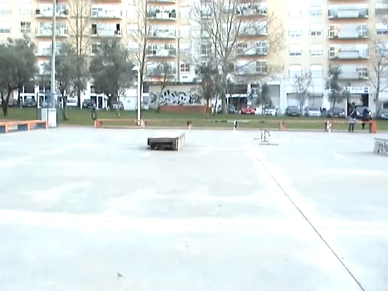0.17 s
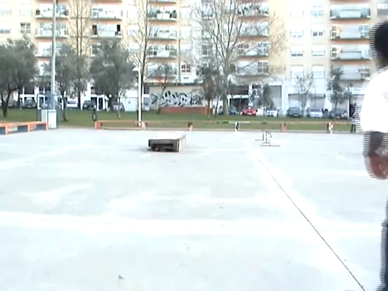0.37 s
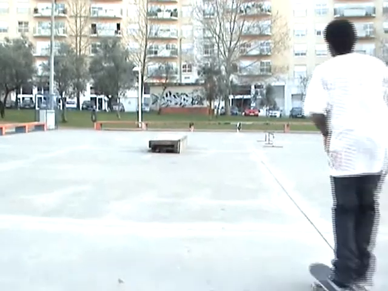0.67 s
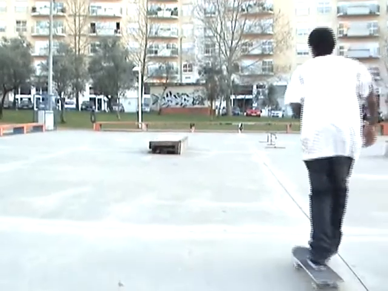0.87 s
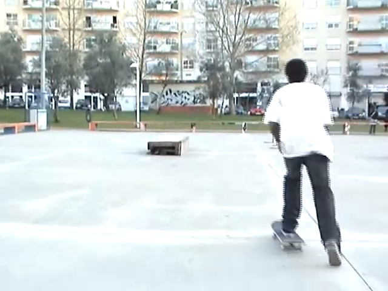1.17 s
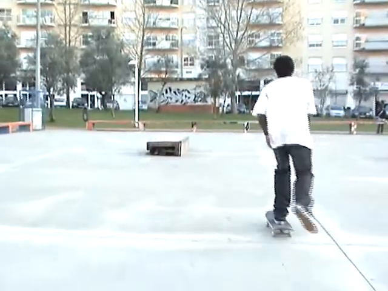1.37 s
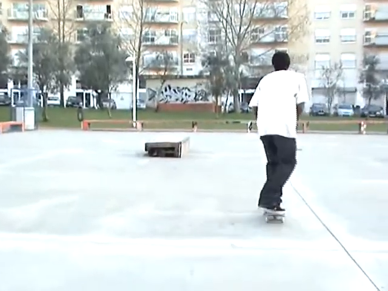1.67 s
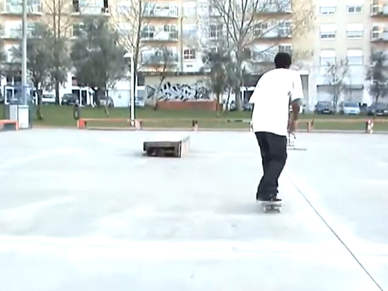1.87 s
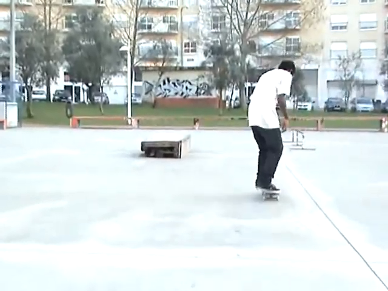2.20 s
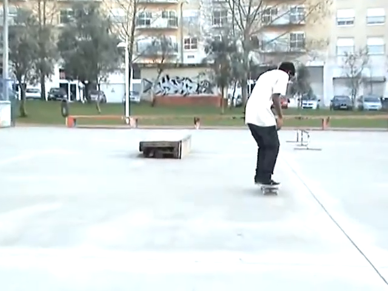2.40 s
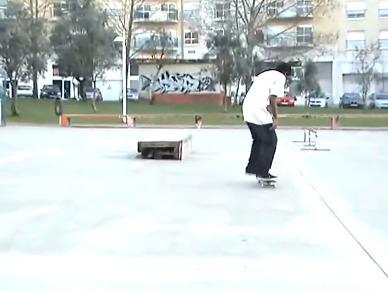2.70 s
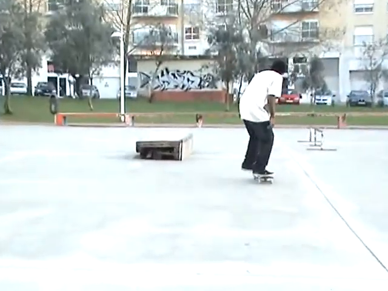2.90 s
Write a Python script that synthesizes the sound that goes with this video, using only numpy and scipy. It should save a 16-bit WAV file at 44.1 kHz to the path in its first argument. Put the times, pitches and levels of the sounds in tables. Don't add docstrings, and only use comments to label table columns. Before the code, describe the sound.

Skateboard wheels roll on gritty concrete after 0.1 s of silence. Loose trucks rattle and deck knocks cluster at 0.2-0.35 s; a soft shoe thump falls near 0.65. A brighter metallic rattle with faint squeal comes at 1.1-1.4, hard clacks at 1.45 and 1.58, lighter knocks at 1.8-2.3, low hum near 2.1, and a sharp double clack at 2.96. Faint traffic hiss and breeze stay behind.

```python
import sys
import numpy as np
from scipy import signal
from scipy.fft import rfft, irfft, next_fast_len
from scipy.io import wavfile
from scipy.ndimage import uniform_filter1d, map_coordinates

SR = 44100
rng = np.random.default_rng(int(sys.argv[2]) if len(sys.argv) > 2 else 0)


def master_out(mix):
    frames = np.transpose(np.atleast_2d(mix))
    ceiling = np.clip(frames, -1, 1)
    pcm = np.round(ceiling * 32767).astype(np.int16)
    wavfile.write(sys.argv[1], SR, pcm)


def elevation(decibels):
    levels = np.asarray(decibels, float)
    return 10 ** (levels / 20)


N = 134505


def unit(x):
    return x / np.sqrt(np.mean(x ** 2) + 1e-20)


def along(points, hz):
    f, v = np.transpose(points)
    return np.interp(np.log(hz + 1), np.log(f + 1), v)


def curves(rows):
    s, *cols = np.transpose(rows)
    return [np.interp(np.arange(N) / SR, s, c) for c in cols]


def wobble(rate_hz):
    knots = rng.standard_normal(int(N * rate_hz / SR) + 4)
    return map_coordinates(knots, [np.arange(N) * rate_hz / SR])


def swell(centre_s, half_s):
    return np.exp(-((np.arange(N) / SR - centre_s) / half_s) ** 4)


def filtered(x, response):
    m = next_fast_len(N + SR // 2)
    return irfft(rfft(x, m) * response(np.fft.rfftfreq(m, 1 / SR)), m)[..., :N]


def coloured(x, spectrum):
    return unit(filtered(x, lambda hz: elevation(along(spectrum, hz))))


def body(peaks):
    def response(f):
        total = 0
        for k, (centre, width, db) in enumerate(peaks):
            damping = 1j * f * width
            total = total + (-1) ** k * elevation(db) * damping / (centre ** 2 - f ** 2 + damping)
        return total
    return response


def ringing(x, peaks, slope_hz, slope_width_hz):
    modes = filtered(x, body(peaks))
    return unit(filtered(modes, body([(slope_hz, slope_width_hz, 0)])))


def grit(rate_hz, depth_db):
    return unit(rng.standard_normal(N) * elevation(depth_db * wobble(rate_hz)))


def patchy(x, depth_db):
    z = signal.stft(x, nperseg=256)[2]
    field = uniform_filter1d(rng.standard_normal(z.shape), size=5, axis=0)
    field = uniform_filter1d(field, size=12, axis=1)
    return unit(signal.istft(z * elevation(depth_db * unit(field)), nperseg=256)[1][:N])


def scatter(x):
    z = signal.stft(x, nperseg=256)[2]
    turned = z * np.exp(2j * np.pi * rng.random(z.shape))
    return 1.9 * signal.istft(turned, nperseg=256)[1][:N]


def contacts(rows, t60_s, wide, splash_db):
    rise_s, trim_db = 0.0006, -1.5
    out, t = np.zeros(N), np.arange(SR // 40) / SR
    f = np.fft.rfftfreq(len(t), 1 / SR) + 1
    shape = elevation(-60 * t / t60_s) * (1 - np.exp(-t / rise_s))
    for s, db, hz in rows:
        start = round(s * SR)
        offset = np.log(f / hz) / wide
        gain = np.exp(-offset ** 2) + elevation(splash_db) * np.exp(-(offset / 6.6) ** 2)
        burst = shape * irfft(rfft(rng.standard_normal(len(t))) * gain, len(t))
        burst = burst / np.abs(burst).max()
        out[start:][:len(t)] += elevation(db + trim_db) * burst[:N - start]
    return out


def town():
    # f/Hz, level/dB per Hz
    hiss_spectrum = [(880, 0.5), (1500, -11.5), (1770, 4), (3580, -11.5), (6970, -12.5), (10300, -43),
                     (11900, -19), (15600, -55)]
    # f/Hz, level/dB per Hz
    breeze_spectrum = [(15, -40), (30, -3), (42, 8), (60, 6), (110, -33), (250, -120)]
    hiss = elevation(-37.5 + 0.2 * wobble(1.7)) * coloured(rng.standard_normal(N), hiss_spectrum)
    return hiss + elevation(-42) * coloured(rng.standard_normal(N), breeze_spectrum)


def fronts(x, t60_s):
    t = np.arange(SR // 4) / SR
    tail = rng.standard_normal((2, len(t))) * elevation(-60 * t / t60_s)
    return signal.fftconvolve(x[None], tail / np.linalg.norm(tail[0]), axes=1)[:, :N]


def shoe():
    # t/s, level/dB, f/Hz
    footfalls = [
        (0.65, -11.5, 75.6),
        (1.178, -18, 121),
        (1.231, -16.5, 116),
        (1.784, -13.5, 71.4),
        (1.791, -27, 170),
        (1.885, -22.5, 90),
    ]
    out, t = np.zeros(N), np.arange(SR // 8) / SR
    for s, db, hz in footfalls:
        push = t / 0.0045 * np.exp(-t / 0.0062) * np.sin(2 * np.pi * hz * t)
        out[round(s * SR):][:len(t)] -= elevation(db + 4) * push
    return out


def joints():
    # t/s, peak/dB, blow f/Hz, blow time/ms; mostly wheels over slab edges, while the rows at
    # .652 and .667 are the hard edges of the firm foot push at 0.65 s
    deck_blows = [(.228, -7.5, 700, 1.9), (.2645, -7.5, 720, 1.1), (.335, -9, 700, 2.6),
                  (.352, -12.5, 700, 2.7), (.45, -14, 710, 2.5), (.59, -10, 567, 3.1),
                  (.652, -10, 610, 0.28), (.667, -10, 670, 0.75), (1.176, -6.5, 640, 2.4),
                  (1.226, -9, 624, 2.2), (1.274, -13, 700, 1.9), (1.4454, -6, 290, 1.55),
                  (1.447, -1, 650, 1.5), (1.576, -4, 870, 0.46), (1.582, -2, 504, 1.3),
                  (1.587, -5.5, 300, 0.81), (1.592, -9.5, 278, 0.44), (1.779, -9, 890, 1.2),
                  (1.7936, -5, 680, 0.35), (1.84, -11, 500, 0.42), (1.8545, -7, 700, 1.1),
                  (2.014, -10, 610, 2), (2.309, -7, 484, 1.5), (2.955, 0, 507, 0.54),
                  (2.962, -2.5, 700, 0.89)]
    # f/Hz, width/Hz, level/dB
    struck_modes = [(267, 58, 2.5), (520, 94, 0), (700, 71, 3.5), (1133, 96, -3), (1770, 73, 2)]
    tone_spread_db = 1.5
    out, t = np.zeros(N), np.arange(SR // 16) / SR
    hz = np.fft.rfftfreq(len(t), 1 / SR)
    for s, db, blow_hz, ms in deck_blows:
        rough = np.cos(2 * np.pi * blow_hz * t) + 0.82 * rng.standard_normal(len(t))
        blow = rough * t * np.exp(-1000 * t / ms)
        modes = [(c, w, g + tone_spread_db * rng.standard_normal()) for c, w, g in struck_modes]
        knock = irfft(rfft(blow) * body(modes)(hz), len(t))
        out[round(s * SR):][:len(t)] += elevation(db - 4.5) * knock / np.abs(knock).max()
    return out


def truck_contacts():
    # t/s, peak/dB, f/Hz
    washer_clicks = [(0.156, -21, 5870), (0.2289, -18, 7600), (0.235, -18, 6040), (0.2534, -25, 6010),
                     (0.2807, -20, 7110), (0.2942, -19, 7310), (0.3104, -21, 5400), (0.3202, -19, 5640),
                     (0.3644, -23, 7890), (0.417, -19, 7200), (0.4733, -20, 6600), (0.5172, -24, 6610),
                     (1.126, -13, 5600), (1.1448, -16, 5220), (1.1583, -14, 5710), (1.177, -16, 5670),
                     (1.1894, -18, 5790), (1.2014, -19, 5800), (1.2164, -18.5, 5930), (1.2264, -20, 5840),
                     (1.273, -11, 6250), (1.2854, -13, 5860), (1.306, -15, 7920), (1.3239, -18, 6170),
                     (1.3356, -12, 6310), (1.3464, -20, 7050), (1.3583, -11, 6230), (1.4471, -18, 7790),
                     (1.486, -21, 7520), (1.583, -20, 7300), (1.9594, -29, 5940), (2.0214, -21, 5230),
                     (2.5516, -21, 7320), (2.583, -22, 6900), (2.6389, -19.5, 7700), (2.9557, -23, 5340),
                     (2.9627, -20, 5310)]
    # t/s, peak/dB, f/Hz
    nut_ticks = [(0.1654, -21, 4420), (0.2246, -17, 2770), (0.2508, -12.5, 3830), (0.2944, -13.5, 2830),
                 (0.3206, -16, 2890), (0.4164, -27, 3500), (0.5169, -26, 3180), (0.5916, -21, 3450),
                 (0.658, -21, 4020), (1.204, -21, 3700), (1.215, -16, 3650), (1.2735, -22, 3700),
                 (1.3224, -21, 4020), (1.3613, -18.5, 3500), (1.45, -19, 3310), (2.3594, -26.5, 4310),
                 (2.9549, -29, 4550), (2.9617, -23, 2800)]
    # t/s, peak/dB, centre f/Hz
    edge_cracks = [(.2285, -17, 3500), (.2945, -17, 4000), (.3215, -18, 4000), (1.449, -18, 5000),
                   (1.486, -21, 5500), (1.583, -13, 4200), (2.552, -25, 6500), (2.639, -18, 6500),
                   (2.963, -18, 3500)]
    # t/s, peak/dB, f/Hz
    hanger_taps = [(0.2272, -8, 2210), (0.2313, -10, 1540), (0.242, -7.5, 1440), (0.251, -14, 1180),
                   (0.2643, -9, 1410), (0.2939, -18, 1590), (0.3064, -12, 1290), (0.3172, -11, 1770),
                   (0.3249, -11, 1700), (0.3467, -11.5, 1340), (1.2026, -8.5, 1860), (1.273, -11, 1810),
                   (1.3644, -11, 1450), (1.5808, -10.5, 1820), (1.8292, -14.5, 1770), (2.9619, -10, 1690)]
    bright = contacts(washer_clicks, t60_s=0.016, wide=0.15, splash_db=-7.5)
    bright = bright + contacts(nut_ticks, t60_s=0.016, wide=0.15, splash_db=-23)
    broad = contacts(edge_cracks, t60_s=0.011, wide=0.77, splash_db=-30)
    dull = contacts(hanger_taps, t60_s=0.011, wide=0.3, splash_db=-14.5)
    return bright + broad + dull


def squeal(chatter):
    squeal_hz = 3735
    tone = ringing(chatter, [(squeal_hz, 70, 0)], squeal_hz, 200)
    return elevation(-32.5) * swell(1.24, half_s=0.076) * tone


def trucks():
    # t/s, rattle level/dB, load 0-1
    shaking = [(.1, -39, 0.3), (.165, -30, 0.3), (.205, -31.5, 0.14), (.24, -27.5, 0.1), (.285, -33.5, 0.4),
               (.325, -24.5, 0.3), (.36, -32.5, 0.17), (.9, -39, 0.6), (1.1, -35, 0.74), (1.2, -26.5, 0.62),
               (1.365, -25, 0.68), (1.385, -28, 0.72), (1.55, -39, 0.82), (2.05, -36, 0.6), (2.5, -42.5, 0),
               (2.55, -36, 0.47), (2.68, -38, 0.43), (3.05, -41, 0.64)]
    # f/Hz, level/dB per Hz
    pressed_spectrum = [(880, -16), (1500, -11), (1820, 2.5), (1970, -17), (2860, -28), (3620, -15.5),
                        (6390, -14), (11700, -22), (15600, -45)]
    # f/Hz, level/dB per Hz
    loose_spectrum = [(650, -51), (1100, 1), (1530, -0.5), (2020, -2), (7320, -16), (13200, -23.5),
                      (15600, -26)]
    # f/Hz, width/Hz, level/dB
    axle_modes = [(1810, 45, 11), (3730, 45, -2), (5780, 110, -3), (6270, 90, -3), (7600, 400, -7)]
    shake_db, load = curves(shaking)
    load = np.clip(load, 0, 1)
    chatter = patchy(grit(400, depth_db=1.5) * elevation(1.14 * wobble(90)), depth_db=1.5)
    axle = unit(filtered(chatter, body(axle_modes)))
    pressed = coloured(chatter, pressed_spectrum) + elevation(4.5) * load ** 3 * axle
    loose = elevation(4.0) * coloured(chatter, loose_spectrum)
    rattle = elevation(shake_db + 2.0) * (load * pressed + (1 - load) * loose)
    return rattle + squeal(chatter) + truck_contacts()


def wheel_drone():
    hum = unit(filtered(rng.standard_normal(N), body([(156, 14, 0)])))
    return elevation(-29) * swell(2.09, half_s=0.12) * hum


def wheels():
    # t/s, rolling level/dB, deck ringing/dB, weight on the wheels/dB
    rolling = [(.1, -33.5, -1.5, -0.5), (.16, -35, 13.5, 5), (.29, -33.5, 7, -1), (.36, -30.5, 10, 3),
               (.43, -27.5, -1, 2), (.7, -31.5, 6.5, 3), (1.05, -29.5, 0.5, 3.5), (1.2, -25, 0.5, -0.5),
               (1.3, -27.5, 7, -1), (1.43, -26.5, 1.5, -0.5), (1.52, -27.5, -41, -1), (1.84, -30, -4, 4),
               (2.02, -26, -10, -6), (2.3, -28.5, -17, -0.5), (2.5, -30.5, -45, -4),
               (2.65, -28.5, -3, -2.5), (2.8, -29, 1, -2), (3.05, -30, -9, -1)]
    # t/s, level/dB
    foot_stance = [(.1, -14), (.3, -11), (.45, -4), (.6, 1), (.8, -22), (1.12, -5.5), (1.24, -6),
                   (1.29, -8), (1.36, 2), (1.6, -6), (1.7, -15), (2.2, -7), (2.32, 7), (2.45, -23),
                   (3.05, -1.5)]
    # f/Hz, level/dB per Hz
    tread_spectrum = [(150, -5.5), (250, -7), (434, -4), (700, 2), (1000, -4.5), (1250, 0), (1950, -7),
                      (2250, -15), (3500, -24.5), (6600, -120)]
    # f/Hz, level/dB per Hz
    ground_spectrum = [(21, -24), (36, -19), (155, 0), (344, -6.5), (400, -10), (520, -26), (880, -120)]
    # f/Hz, width/Hz, level/dB
    deck_modes = [(640, 120, -1.5), (705.6, 35, 11), (1234, 43, -14.5), (1312, 31, -12)]
    # f/Hz, width/Hz, level/dB
    flex_modes = [(507.6, 36, 0.5), (568.4, 26, -4.5)]
    weight_limit_db = 8
    roll_db, ring_db, weight_db = curves(rolling)
    flex_db, = curves(foot_stance)
    bumps_db = roll_db + 0.64 * wobble(45.65)
    push = grit(260, depth_db=1.5)
    tread = elevation(3) * coloured(push, tread_spectrum)
    deck = elevation(ring_db - 1 + 0.85 * wobble(25.0)) * ringing(push, deck_modes, 680, 600)
    flex = elevation(flex_db - 2.5) * ringing(push, flex_modes, 550, 200)
    weight_db = np.clip(weight_db, -weight_limit_db, weight_limit_db) - 0.5 + 0.28 * wobble(18.0)
    ground = elevation(weight_db) * coloured(grit(90, depth_db=2.5), ground_spectrum)
    return elevation(bumps_db) * (tread + deck + flex + ground) + wheel_drone()


def scene():
    board = town() + shoe() + joints() + trucks() + wheels()
    return board + elevation(-40.5) * fronts(board, t60_s=1.0)


def top_cut(x):
    return signal.sosfilt(signal.butter(12, 15800, fs=SR, output="sos"), x)


def record(dry):
    # f/Hz, side over mid/dB
    port_side = [(40, -6.5), (150, -14.5), (600, -22), (1500, -26.5), (4500, -15), (6500, -8), (9000, 0),
                 (15000, -2)]
    # f/Hz, share of side in phase with mid
    port_lean = [(30, 0.67), (200, 0.13), (500, -0.88), (3000, -0.83), (8000, 0.81), (14000, -0.89)]
    # f/Hz, scattered part of side/dB
    port_unlike = [(60, -5.5), (1000, 8.5), (5000, -8.5), (9000, -4), (14000, -4)]
    start_s, fade_s, top_hz = 0.0967, 0.0015, 15780
    grille_hz, grille_db = 8480, -6.5

    def phase_step(hz):
        lean = np.clip(along(port_lean, hz), -1, 1)
        return lean + 1j * np.sqrt(1 - lean ** 2)

    def grille(hz):
        return elevation(grille_db / (1 + np.exp(np.clip((grille_hz - hz) / 150, -40, 40))))

    mid = dry.mean(axis=0)
    stepped = filtered(mid, phase_step)
    apart = filtered(scatter(mid), lambda hz: elevation(along(port_unlike, hz)))
    side = filtered(stepped + apart, lambda hz: elevation(along(port_side, hz) - 4.0))
    side = side + (dry[0] - dry[1]) / 2
    mid = filtered(mid, grille)
    opened = np.clip((np.arange(N) / SR - start_s) / fade_s, 0, 1)
    stereo = filtered(np.array([mid + side, mid - side]), lambda hz: hz < top_hz)
    return top_cut(opened * stereo)


dry = scene()
out = record(dry)
master_out(out)
```